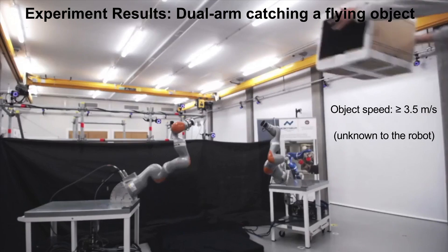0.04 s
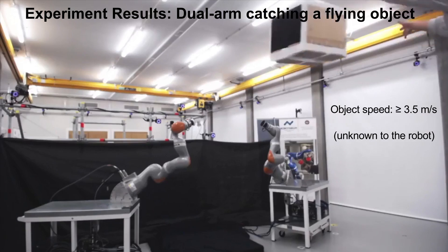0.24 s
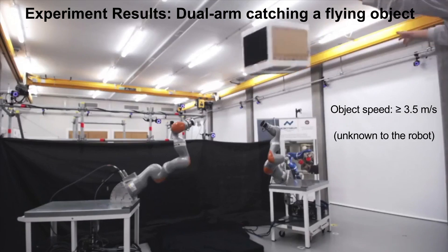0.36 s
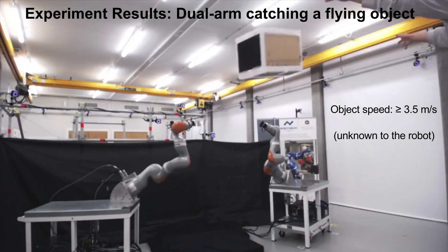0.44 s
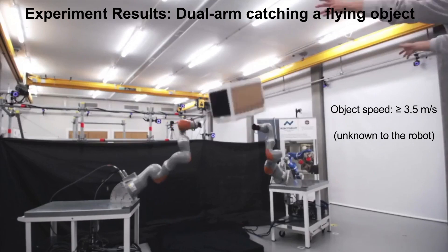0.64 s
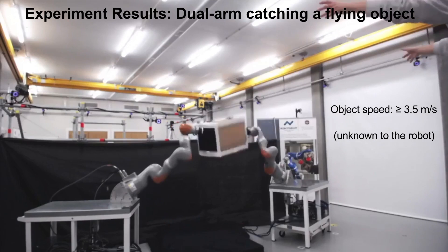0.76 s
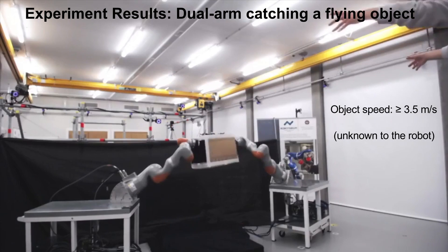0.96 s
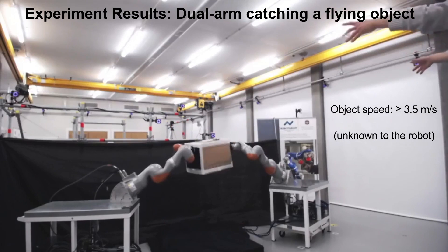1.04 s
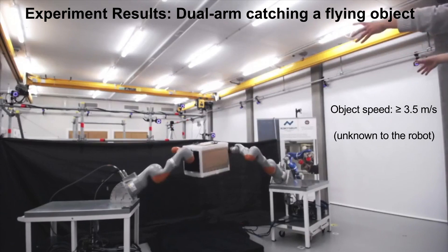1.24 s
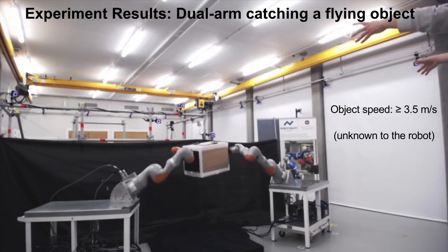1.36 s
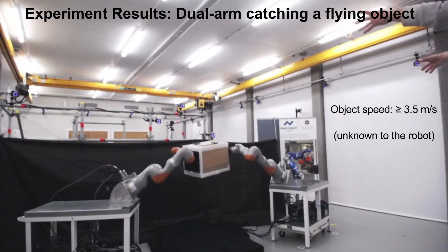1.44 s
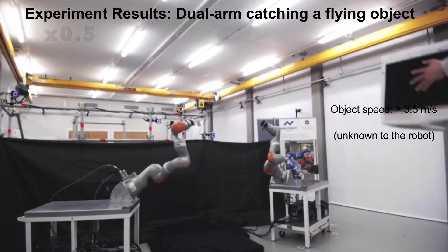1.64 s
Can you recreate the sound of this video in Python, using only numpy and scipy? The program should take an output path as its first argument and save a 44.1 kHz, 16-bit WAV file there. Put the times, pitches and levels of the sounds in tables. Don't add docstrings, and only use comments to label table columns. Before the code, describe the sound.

Hollow cardboard box thuds, a rapid cluster of blows with papery cracks, ringing through a humming lab.

```python
import sys
import numpy as np
from scipy import signal
from scipy.fft import rfft, irfft
from scipy.io import wavfile
from scipy.ndimage import uniform_filter1d

SR = 44100
rng = np.random.default_rng(int(sys.argv[2]) if len(sys.argv) > 2 else 0)


def voltage_ratio(decibels):
    exponent = np.asarray(decibels, float) / 20
    return 10 ** exponent


def inscribe(sig):
    pcm = np.round(np.clip(np.atleast_2d(sig).T, -1, 1) * 32767)
    wavfile.write(sys.argv[1], SR, pcm.astype(np.int16))


N = 74970

# frequency in Hz, density in dB per Hz.
FAN_SPECTRUM = [(25, -9.5), (50, -14.5), (200, -5.5), (500, -9.5), (1380, -15), (1700, -27), (5000, -34.5),
                (15400, -44.5)]
# frequency in Hz, level in dB.
FAN_HUMS = [(205.5, -55.5), (684, -70.5)]
# frequency in Hz, density in dB per Hz.
SWING_SPECTRUM = [(25, -13), (110, -1.5), (420, -4.5), (700, -15.5), (1350, -11), (1750, -25.5),
                  (3000, -20.5), (15000, -46)]
# time in seconds, level in dB.
FLOOR_SHAKE = [
    (0.0, -74),
    (0.056, -80),
    (0.25, -33),
    (0.278, -57),
    (0.576, -33.5),
    (0.9, -57.5),
]
# frequency in Hz, level in dB.
DRIVE_SIDE_TONES = [(6993, -87.5), (7262, -81)]
# start in seconds, peak in dB.
LATCH_TICKS = [
    (0.8945, -34.5),
    (0.9032, -42),
    (0.9096, -38.5),
]
# frequency in Hz, density in dB per Hz.
TICK_SPECTRUM = [(1500, -22), (3000, -6), (5000, -5.5), (6500, 5), (7800, -4), (11600, -27)]
# frequency in Hz, density in dB per Hz.
SCRAPE_SPECTRUM = [(410, -33), (700, -0.5), (1310, -4), (1700, -12), (2870, -12.5), (8870, -25),
                   (13500, -39), (15000, -72)]
# time in seconds, pressure in dB.
SLIDE_PRESSURE = [
    (0.22, -43.5),
    (0.328, -31),
    (0.392, -30),
    (0.398, -22.5),
    (0.448, -26),
    (0.466, -36.5),
    (0.52, -31),
]
# start in seconds, peak in dB, decay in ms.
EDGE_CRACKS = [
    (.258, -38, 10),
    (.297, -32, 25),
    (.343, -32, 10),
    (.356, -31, 14),
    (.3955, -17, 14),
    (.415, -21, 12),
    (.43, -21, 8),
]
# frequency in Hz, density in dB per Hz.
CRACK_SPECTRUM = [(1060, -50.5), (1800, -5), (5600, -10), (6400, -9.5), (11000, -17.5), (13600, -34),
                  (15000, -106)]
# start in seconds, peak in dB, panel pitch in Hz, decay in ms.
BOX_BLOWS = [(.2445, -13.5, 310, 7.8), (.258, -15.5, 518, 2.6), (.271, -25, 165, 12),
             (.279, -14.5, 188, 3.6), (.286, -16, 350, 8), (.304, -17, 150, 6), (.327, -21, 370, 5),
             (.3425, -13, 600, 3), (.362, -25, 275, 8), (.379, -21, 320, 6), (.398, -24, 265, 5),
             (.4155, -8, 295, 8), (.4165, -10, 760, 6), (.4225, -12, 250, 4), (.4292, -5, 520, 2.2),
             (.437, -17.5, 885, 6.5), (.446, -12.5, 806, 3.3), (.467, -15, 162.9, 15), (.489, -8, 386, 3.2)]
# frequency in Hz, level in dB.
BOX_MODES = [(156.1, -25.5), (236.9, -37.5), (285.3, -29), (538.3, -15.5), (694.4, -45), (732.1, -24.5),
             (807.5, -66), (866.7, -24.5), (1174, -19), (1314, -21), (1550, -58), (1890, -73),
             (2153, -51.5), (2476, -59)]
# frequency in Hz, time to fall 60 dB in seconds.
LAB_T60 = [(60, 1.24), (160, 0.98), (420, 0.96), (1100, 1.0), (2910, 1.034), (7680, 0.57)]
# frequency in Hz, side gain in dB.
HOUSING_WIDTH = [(60, 3), (300, -2.5), (800, -3), (2000, 3.5), (6000, -1), (12000, -2)]
# frequency in Hz, share of the time lost.
BAND_DROPOUTS = [(5000, 0), (6500, .05), (7600, 0), (8500, 0), (9200, .3), (10800, .22), (12000, .1),
                 (15000, .3)]
# frequency in Hz, gain in dB.
EARLIER_TILT = [(30, 5), (150, 2.5), (1500, 1.5), (4000, 2), (15000, -4)]

FANS_DB, HUM_WIDTH_HZ = -48, 3
SWING_DB, SWING_END_S, SWING_T60_S = -40, .3, 1.1
SHAKE_HZ, SHAKE_DB = 31.2, -2
WHINE_HZ, WHINE_DB, WHINE_PAN_DB = 7994, -65, 6.5
WHINE_JITTER_DB, WHINE_ECHO_DB = 2.5, -57
CONTROL_FRAME_HZ, FIRST_BURST_S, BURST_STEP_S, BURST_S = 30.03, 1.2112, .00364, .003
TICK_DECAY_S, TICK_DB, TICK_ROOM_DB = .0063, -8.5, 2
GRAIN_SPREAD_DB, GRAINS_PER_S, SCRAPE_DB = 1.5, 12000, -3
CRACK_DB, CRACK_ROOM_DB = -8, 1.5
BOX_T60_S, BOX_TILT, BOX_DB, KNOCK_DB = .08, .3, -14, 0
CONTACT_TURNS = .28
BOX_ROOM_DB, BUILD_S, PREDELAY_S = -2, .0046, .0014
SPACING_M, LAG_S, PAN_DB = .09, .00021, -1
LOW_CUT_HZ, TOP_EDGE_HZ = 12, 15500
DROPOUT_BAND_HZ, LOUD_TOP_HZ, LOUD_DB, WEAK_SHARE = 560, 13200, -38, .8
CUT_S, FADE_S = 1.522, .015
REPLAY_S, FADE_IN_S, REPLAY_DB = 1.615, .032, -4
REPLAY_FROM_S, REPLAY_WHINE_DB = .0244, 6


def evened(x):
    return x / np.sqrt(np.mean(x ** 2) + 1e-20)


def read(points, hz):
    f, value = np.transpose(points)
    return np.interp(np.log(hz + 1), np.log(f + 1), value)


def curve(points):
    return np.interp(np.arange(N) / SR, *np.transpose(points))


def add(mix, s, sound):
    part = mix[round(s * SR):][:len(sound)]
    part += sound[:len(part)]


def colour(x, spectrum):
    log_gain = read(spectrum, np.fft.rfftfreq(4096, 1 / SR)) * np.log(10) / 20
    whole_circle = np.r_[log_gain, log_gain[-2:0:-1]]
    response = np.exp(np.conj(signal.hilbert(whole_circle)))
    taps = np.fft.ifft(response).real[:2048]
    return signal.oaconvolve(x, taps / np.linalg.norm(taps))[:len(x)]


def shape(x, spectrum):
    return irfft(rfft(x) * voltage_ratio(read(spectrum, np.fft.rfftfreq(N, 1 / SR))), N)


def diffuse(field_db, size):
    hop = size // 4
    hz = np.fft.rfftfreq(size, 1 / SR)[:, None]
    t = np.arange(N // hop + 5) * hop / SR
    a, b, c, d = rng.standard_normal((len(t), len(hz), 4)).T
    same = np.sinc(2 * hz * SPACING_M / 343)
    left = a + 1j * b
    right = same * left + np.sqrt(1 - same ** 2) * (c + 1j * d)
    z = np.array([left, right]) * voltage_ratio(field_db(hz, t))
    return evened(signal.istft(z, nperseg=size, noverlap=size - hop)[1][:, :N])


def steady_noise(spectrum):
    return diffuse(lambda hz, s: read(spectrum, hz) + 0 * s, size=1024)


def waver(r):
    noise = rng.standard_normal(2 * N) + 1j * rng.standard_normal(2 * N)
    return signal.lfilter([1], [1, -r], noise)[N:]


def fans():
    t = np.arange(N) / SR
    r = np.exp(-np.pi * HUM_WIDTH_HZ / SR)
    hums = sum(voltage_ratio(db) * evened((waver(r) * np.exp(2j * np.pi * hz * t)).real) for hz, db in FAN_HUMS)
    return voltage_ratio(FANS_DB) * steady_noise(FAN_SPECTRUM) + hums


def arm_motion():
    t = np.arange(N) / SR
    swing_db = SWING_DB - 60 * np.maximum(t - SWING_END_S, 0) / SWING_T60_S
    swing = voltage_ratio(swing_db) * steady_noise(SWING_SPECTRUM)
    sway = uniform_filter1d(waver(.998).real, 900)
    shake = evened(sway * np.cos(2 * np.pi * SHAKE_HZ * t))
    return swing + voltage_ratio(curve(FLOOR_SHAKE) + SHAKE_DB) * shake


def drive_whine():
    t = np.arange(N) / SR
    since = (t - FIRST_BURST_S + BURST_S / 2) % (1 / CONTROL_FRAME_HZ)
    bursts = np.sin(np.pi * np.minimum(since % BURST_STEP_S / BURST_S, 1)) * (since < 8 * BURST_STEP_S)
    uneven = voltage_ratio(WHINE_JITTER_DB * evened(uniform_filter1d(rng.standard_normal(N), 150)))
    tone = voltage_ratio(WHINE_DB) * evened(bursts * uneven * np.sin(2 * np.pi * WHINE_HZ * t))
    tone = tone + sum(voltage_ratio(db + 9) * np.sin(2 * np.pi * hz * t) for hz, db in DRIVE_SIDE_TONES)
    walls = rng.standard_normal((2, 2000)) * np.exp(-np.arange(2000) / 500)
    smear = signal.oaconvolve(tone[None], walls / np.linalg.norm(walls[0]), axes=1)[:, :N]
    pan = voltage_ratio(np.array([[.5], [-.5]]) * WHINE_PAN_DB)
    return tone * pan + voltage_ratio(WHINE_ECHO_DB) * smear


def latch_ticks():
    out, t = np.zeros(N), np.arange(1000) / SR
    puffs = rng.standard_normal((len(LATCH_TICKS), 1000))
    for (s, db), puff in zip(LATCH_TICKS, puffs):
        add(out, s, voltage_ratio(db + TICK_DB) * puff * np.exp(-t / TICK_DECAY_S))
    return colour(out, TICK_SPECTRUM)


def scrape():
    t = np.arange(N) / SR
    sizes = voltage_ratio(GRAIN_SPREAD_DB * rng.exponential(1, N))
    signs = rng.choice([-1., 1.], N)
    grains = sizes * signs * (rng.random(N) < GRAINS_PER_S / SR)
    touching = (t > SLIDE_PRESSURE[0][0]) & (t < SLIDE_PRESSURE[-1][0])
    pressure = voltage_ratio(curve(SLIDE_PRESSURE) + SCRAPE_DB) * uniform_filter1d(touching * 1., 800)
    return evened(colour(grains, SCRAPE_SPECTRUM)) * pressure


def edge_cracks():
    out, t = np.zeros(N), np.arange(6000) / SR
    puffs = rng.standard_normal((len(EDGE_CRACKS), 6000))
    for (s, db, decay_ms), puff in zip(EDGE_CRACKS, puffs):
        add(out, s, voltage_ratio(db + CRACK_DB) * puff * np.exp(-t * 1000 / max(decay_ms, 5)))
    return colour(out, CRACK_SPECTRUM)


def box_blows():
    push, knocks, t = np.zeros(N), np.zeros(N), np.arange(6000) / SR
    for s, db, hz, decay_ms in BOX_BLOWS:
        u = t * hz / CONTACT_TURNS
        add(push, s, -voltage_ratio(db) * np.sin(np.pi * u) ** 2 * (u < 1) * hz / SR * 10)
        decay = np.minimum(u, 1) * np.exp(-t * 1000 / max(decay_ms, 1))
        add(knocks, s, -voltage_ratio(db) * decay * np.sin(2 * np.pi * hz * t))
    top_db = max(db for hz, db in BOX_MODES)
    ring = np.zeros(len(t))
    for k, (hz, db) in enumerate(BOX_MODES):
        fall_db = 60 * t / BOX_T60_S * (hz / 300) ** BOX_TILT
        ring += (-1) ** k * voltage_ratio(db - top_db - fall_db) * np.sin(2 * np.pi * hz * t)
    return voltage_ratio(BOX_DB) * signal.oaconvolve(push, ring)[:N] + voltage_ratio(KNOCK_DB) * knocks


def lab(x, wet_db, lag_s):
    t = np.arange(N) / SR
    decay = diffuse(lambda hz, s: -60 * s / read(LAB_T60, hz), size=512)
    tail = decay * np.clip((t - PREDELAY_S) / BUILD_S, 0, 1)
    wet = signal.fftconvolve(x[None], tail / np.linalg.norm(tail[0]), axes=1)[:, :N]
    direct = np.array([x * voltage_ratio(PAN_DB), np.interp(t - lag_s, t, x)])
    return direct + voltage_ratio(wet_db) * wet


def microphones(x):
    mid, side = x.mean(0), shape((x[0] - x[1]) / 2, HOUSING_WIDTH)
    low_cut = signal.butter(2, LOW_CUT_HZ, "high", fs=SR)
    x = signal.lfilter(*low_cut, np.array([mid + side, mid - side]))
    top_cut = signal.firwin(511, TOP_EDGE_HZ, window=("kaiser", 9), fs=SR)
    return signal.oaconvolve(x, top_cut[None], "same", axes=1)


def thin_treble(x):
    hz, t, z = signal.stft(x, SR, nperseg=1024, noverlap=768)
    band = (hz / DROPOUT_BAND_HZ).astype(int)
    hz = hz[:, None]
    chance = rng.standard_normal((len(t) // 4 + 1, band[-1] + 1))
    chance = uniform_filter1d(chance, size=3, axis=0)
    rank = chance.argsort(0).argsort(0) / len(chance)
    rank = rank[np.arange(len(t)) // 4][:, band].T
    power = (abs(z) ** 2).mean(0)
    loud = 10 * np.log10(uniform_filter1d(power.sum(0), size=4) + 1e-12) > LOUD_DB
    top_loss = np.clip(.8 * (hz - 6000) / (LOUD_TOP_HZ - 6000), 0, 1) ** 4
    share = read(BAND_DROPOUTS, hz) + loud * top_loss
    weak = (power < WEAK_SHARE * uniform_filter1d(power, size=13, axis=0)) & (hz > 8600)
    kept = z * ((rank >= share) & ~weak)
    return signal.istft(kept, SR, nperseg=1024, noverlap=768)[1][:, :N]


def scene():
    t = np.arange(N) / SR
    air, drive = fans() + arm_motion(), drive_whine()
    box = lab(box_blows(), BOX_ROOM_DB, LAG_S)
    card = lab(edge_cracks() + scrape(), CRACK_ROOM_DB, 0)
    latch = lab(latch_ticks(), TICK_ROOM_DB, 0)
    live = thin_treble(microphones(box + card + latch + air + drive))

    earlier = thin_treble(microphones(shape(air, EARLIER_TILT) + voltage_ratio(REPLAY_WHINE_DB) * drive))
    earlier = earlier[:, round(REPLAY_FROM_S * SR):]
    slow = signal.resample_poly(earlier, 2, 1, axis=1, window=("kaiser", 9))
    start = round((REPLAY_S - FADE_IN_S) * SR)
    fade_in = np.clip((t - REPLAY_S) / FADE_IN_S + 1, 0, 1) ** 4
    replay = np.pad(slow[:, :N - start], ((0, 0), (start, 0))) * fade_in
    fade_out = np.clip((CUT_S - t) / FADE_S + .5, 0, 1)
    return live * fade_out + voltage_ratio(REPLAY_DB) * replay


def band_limit(x):
    return signal.sosfilt(signal.butter(12, 15530, fs=SR, output="sos"), x)


def record(dry):
    return band_limit(dry)


dry = scene()
out = record(dry)
inscribe(out)
```